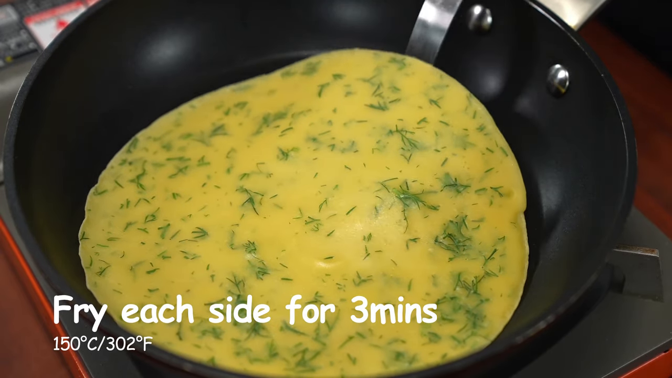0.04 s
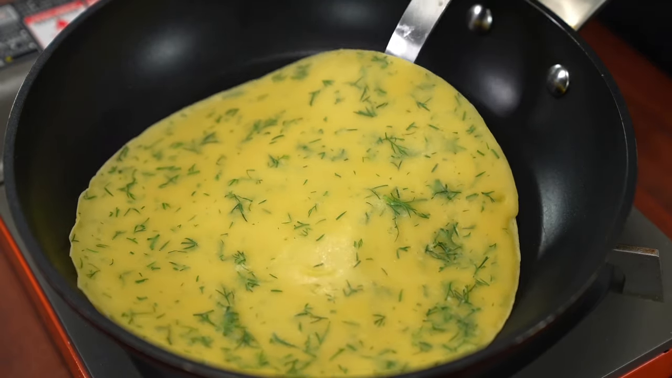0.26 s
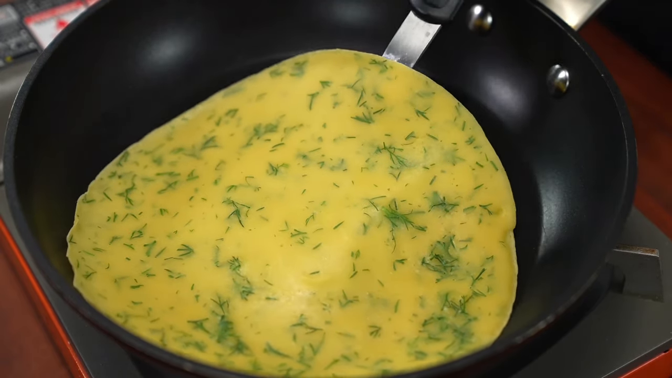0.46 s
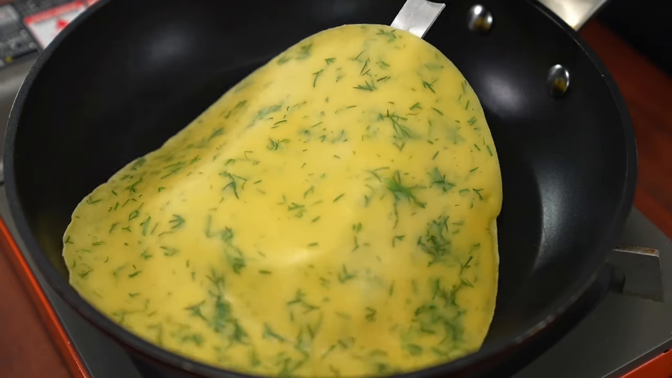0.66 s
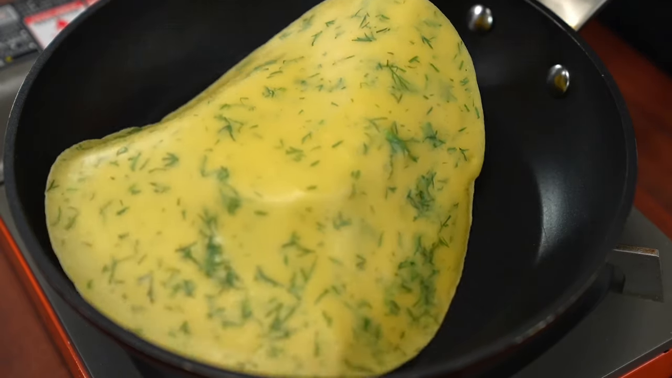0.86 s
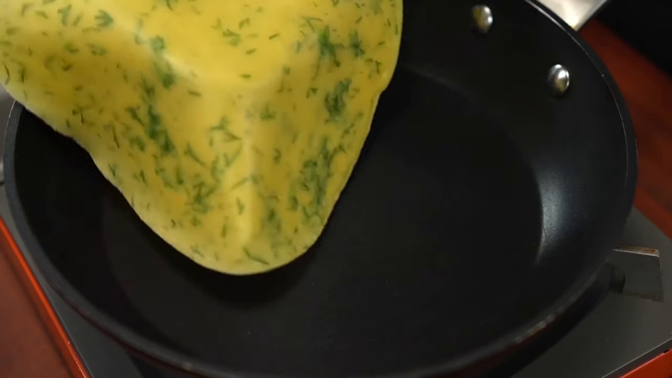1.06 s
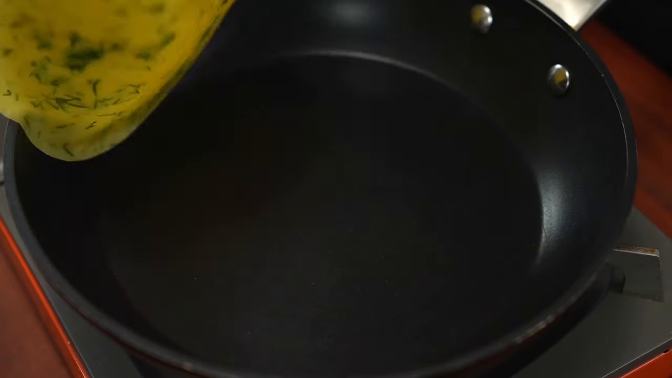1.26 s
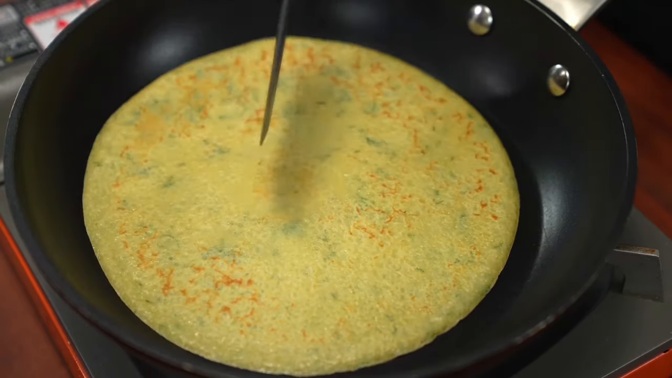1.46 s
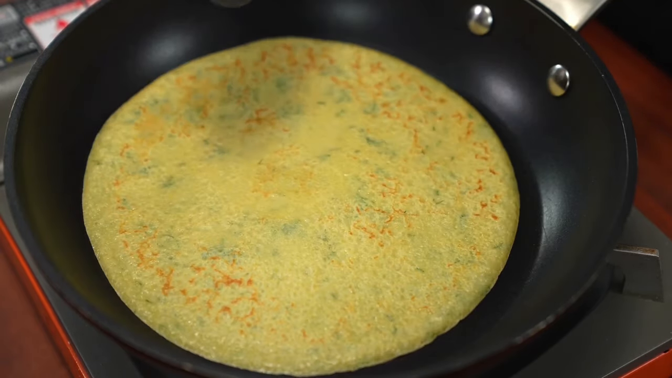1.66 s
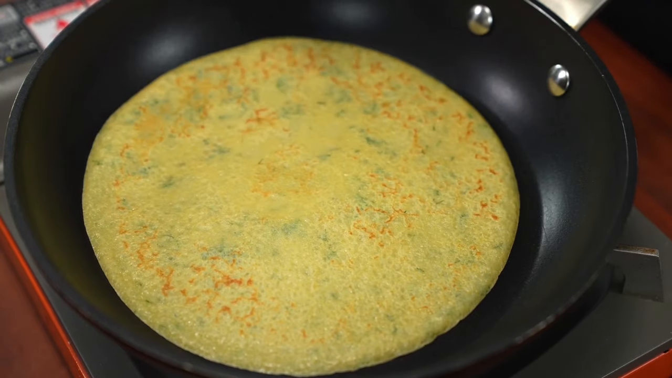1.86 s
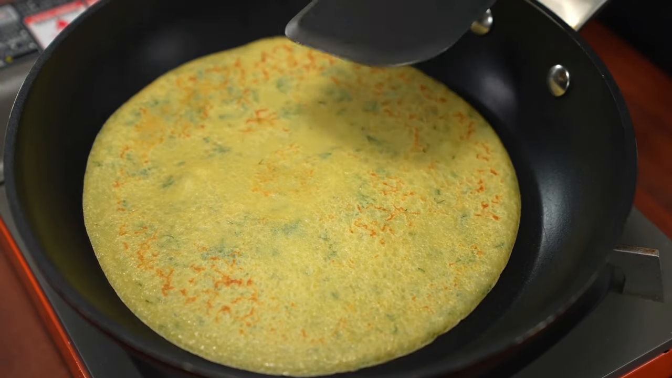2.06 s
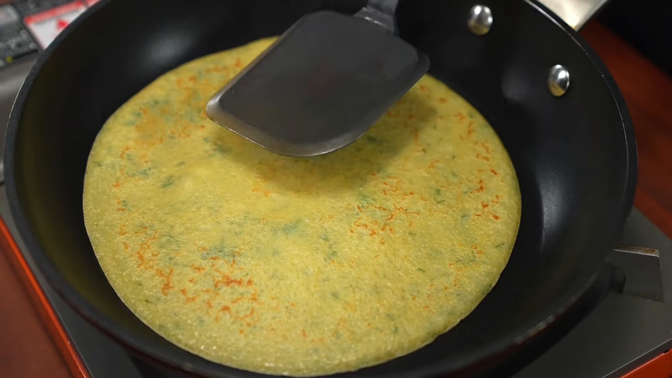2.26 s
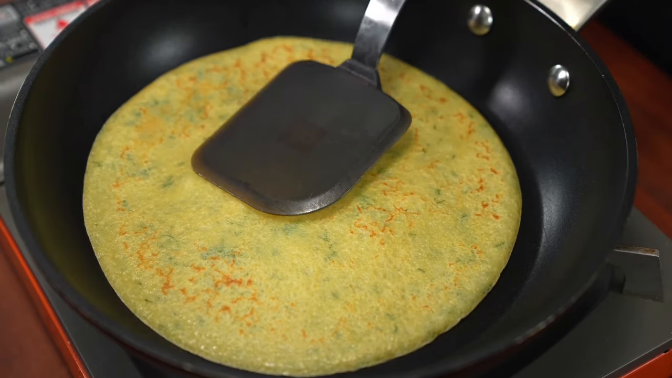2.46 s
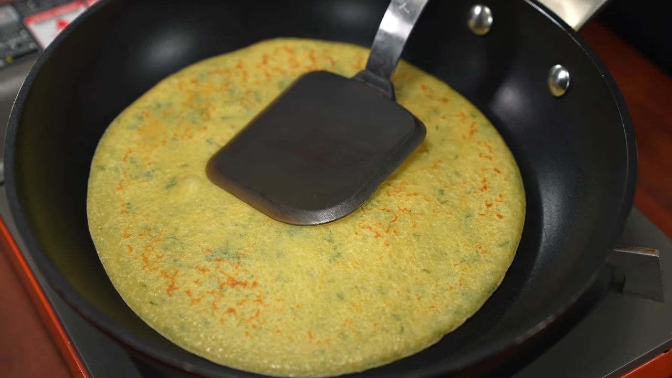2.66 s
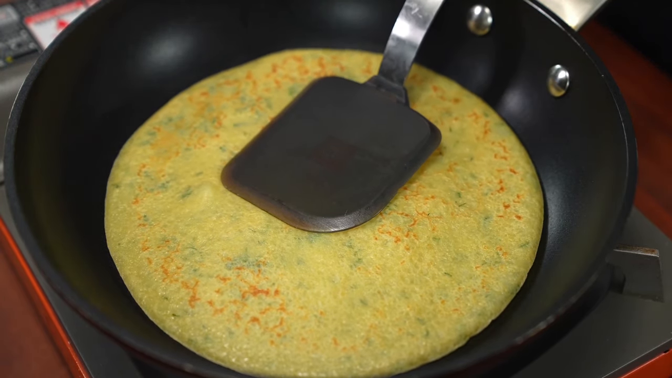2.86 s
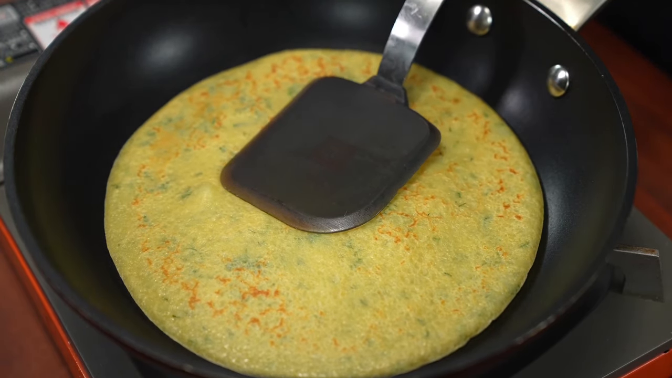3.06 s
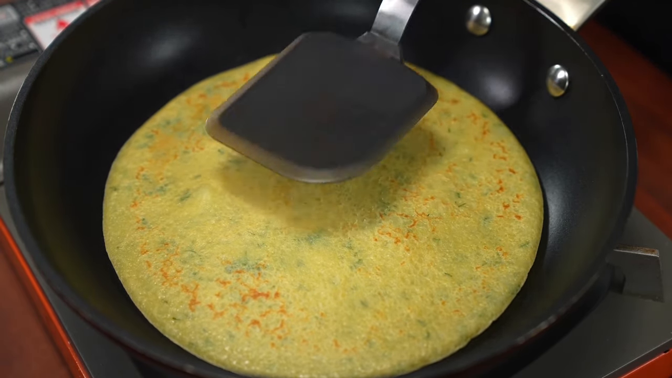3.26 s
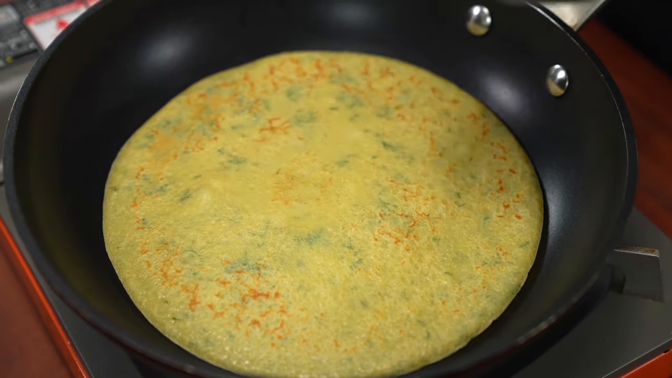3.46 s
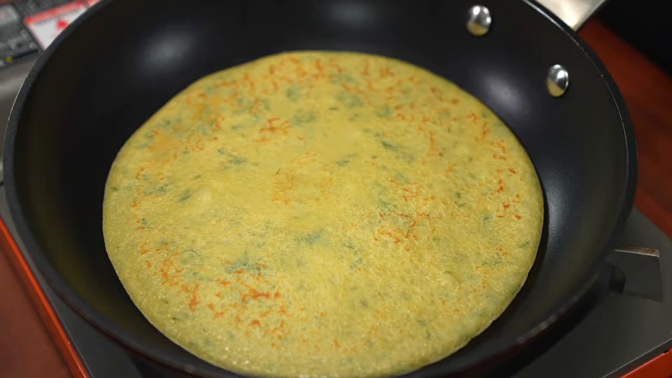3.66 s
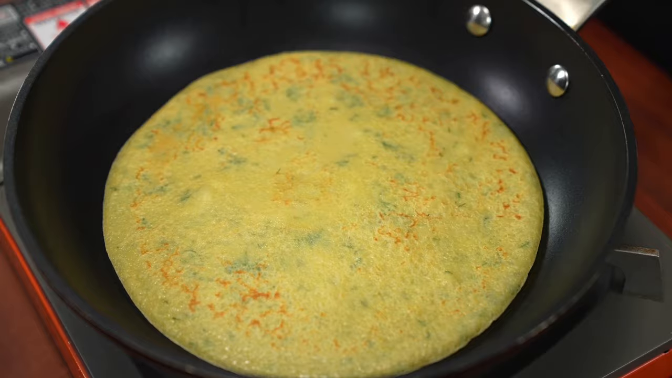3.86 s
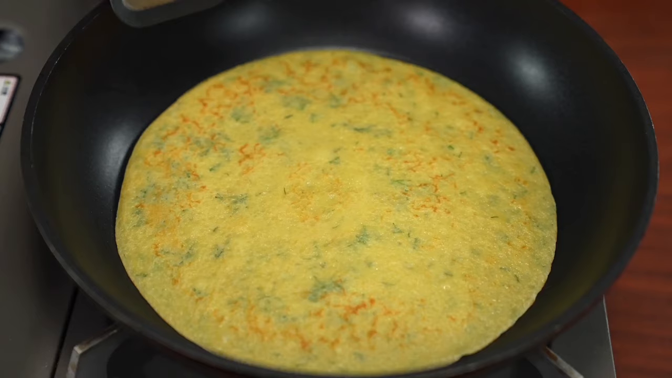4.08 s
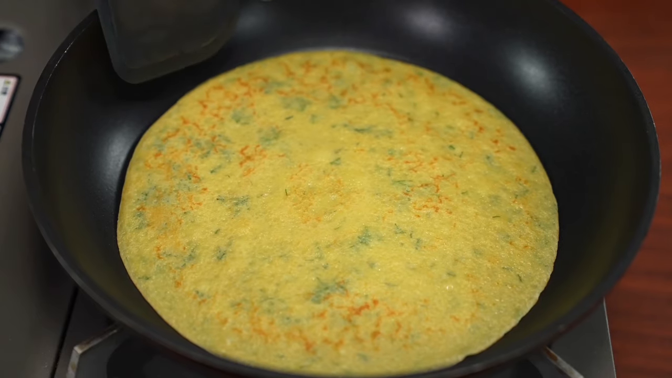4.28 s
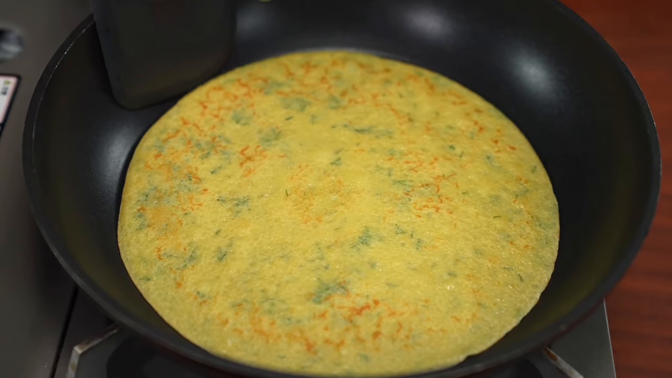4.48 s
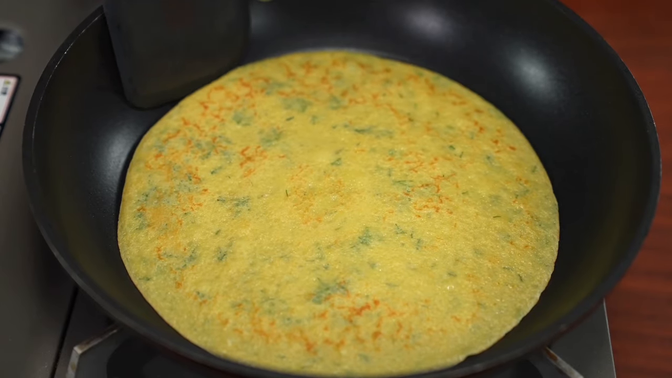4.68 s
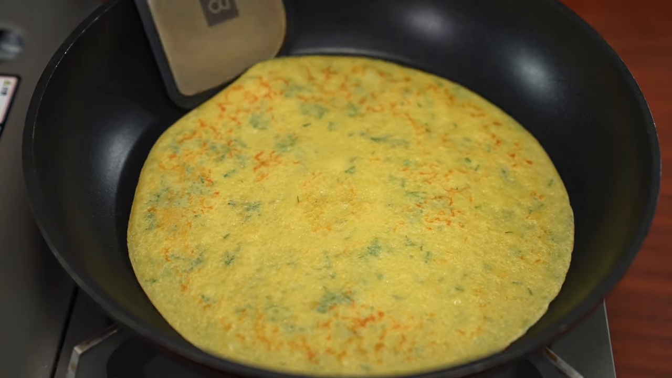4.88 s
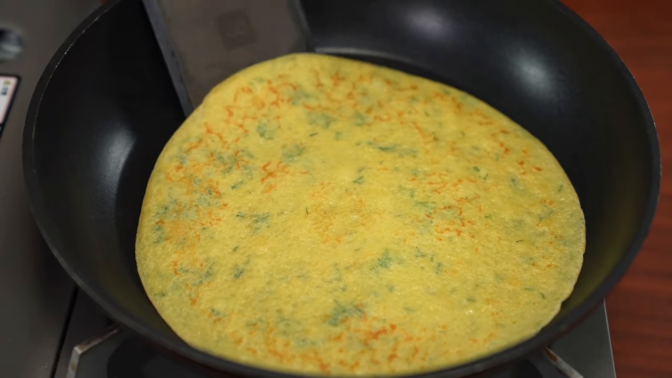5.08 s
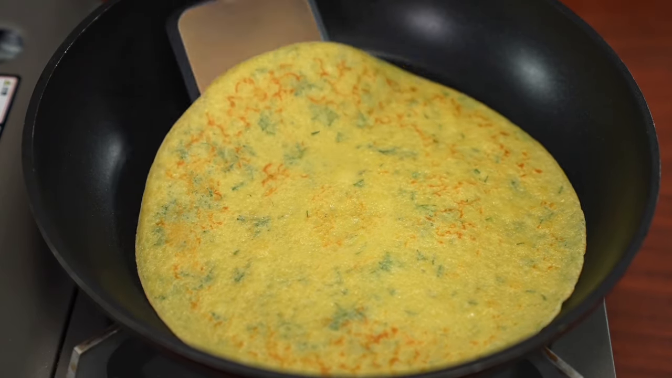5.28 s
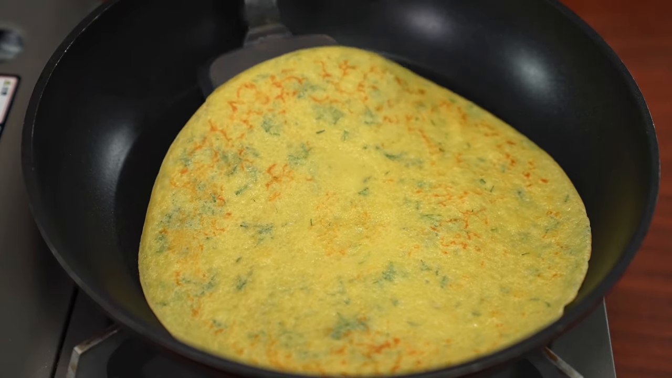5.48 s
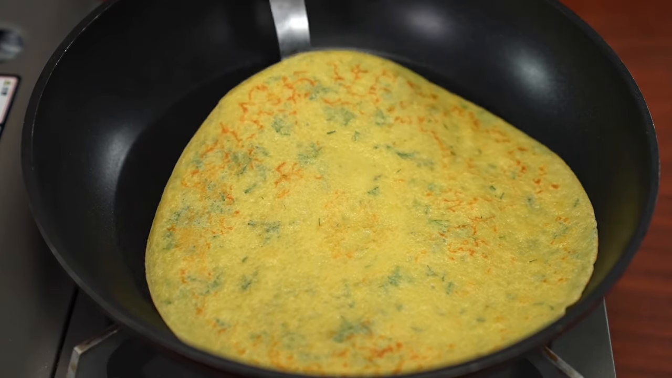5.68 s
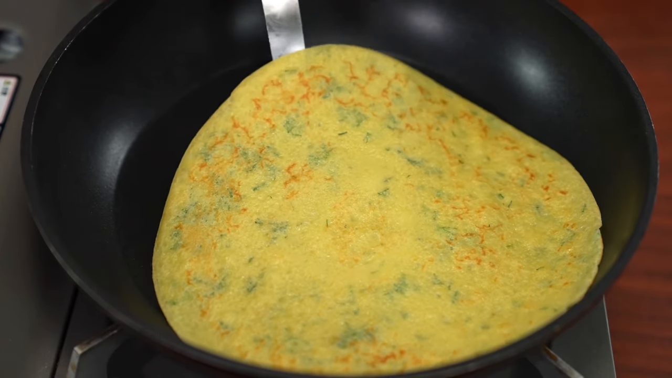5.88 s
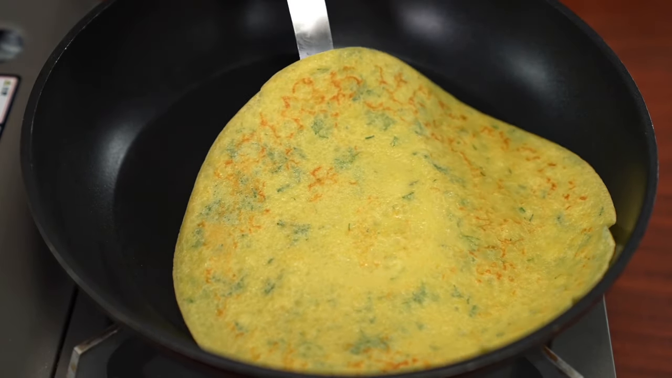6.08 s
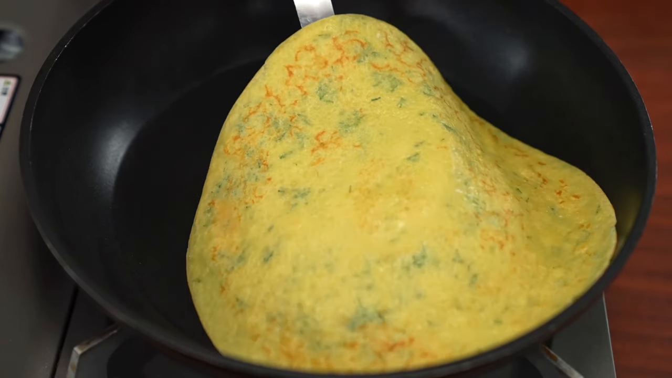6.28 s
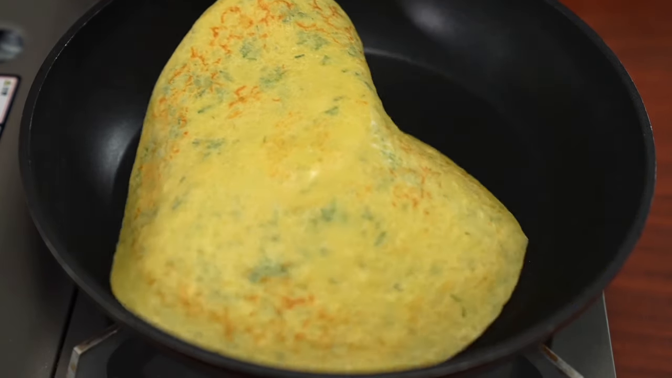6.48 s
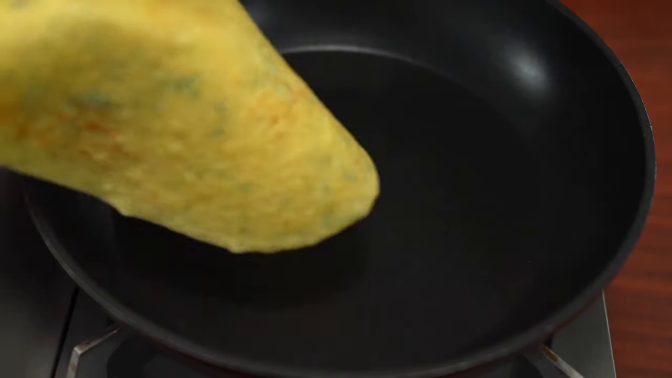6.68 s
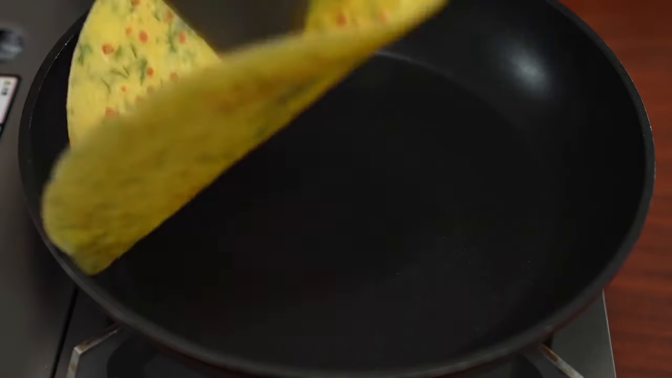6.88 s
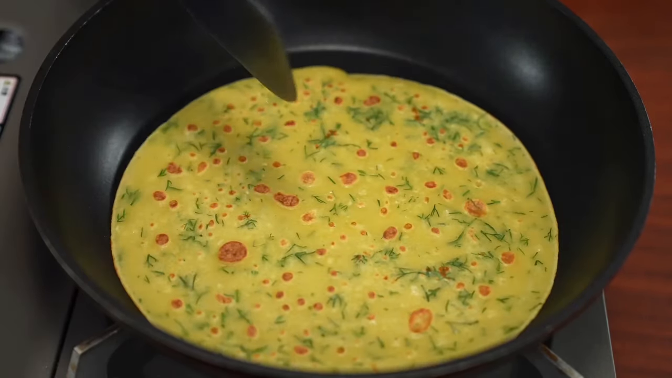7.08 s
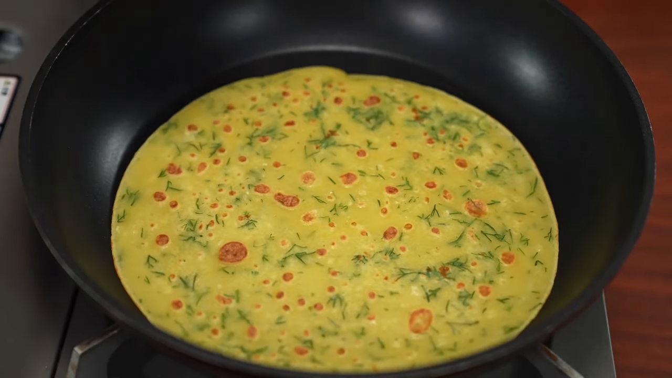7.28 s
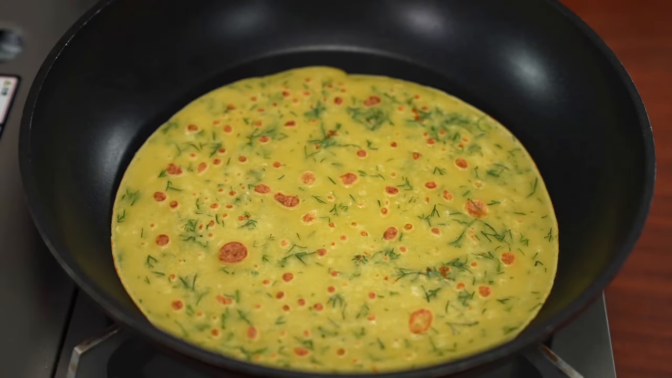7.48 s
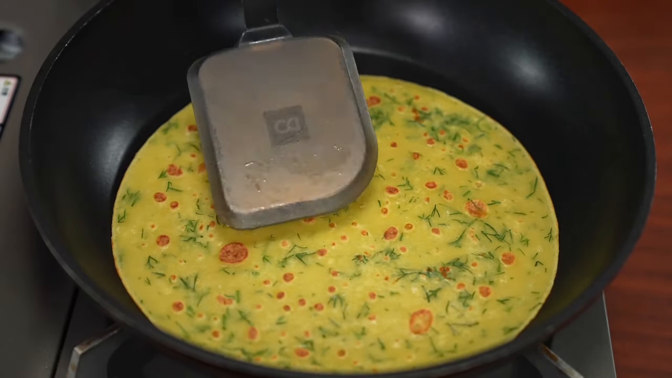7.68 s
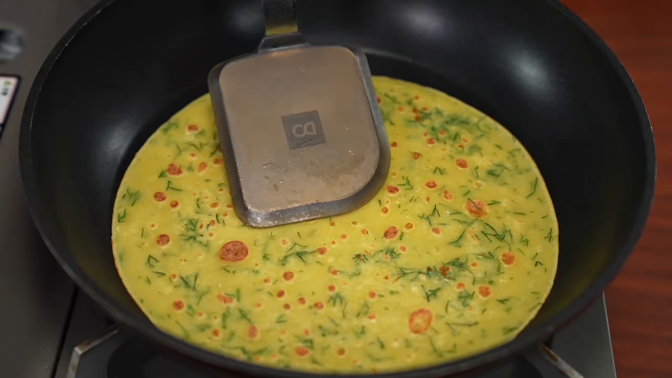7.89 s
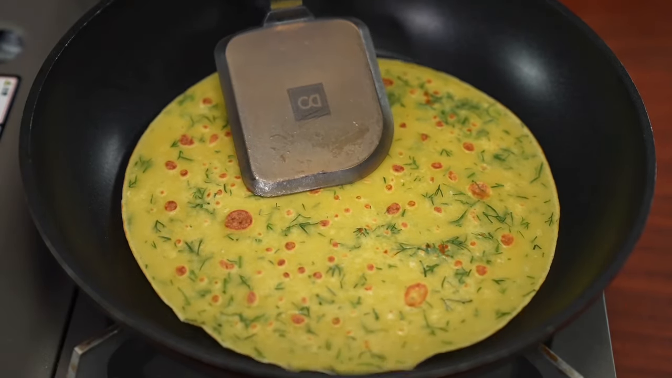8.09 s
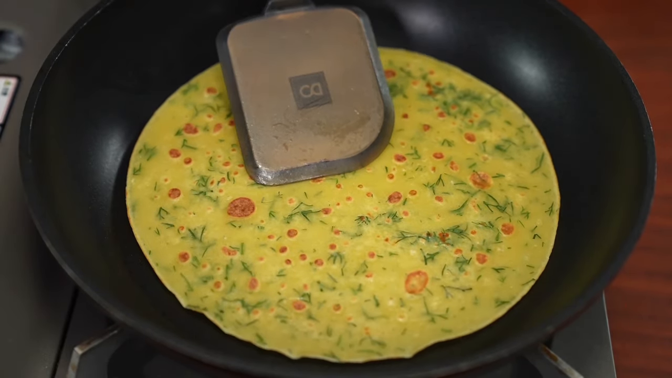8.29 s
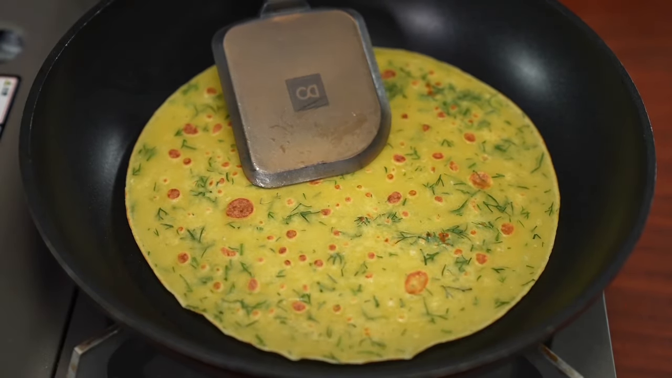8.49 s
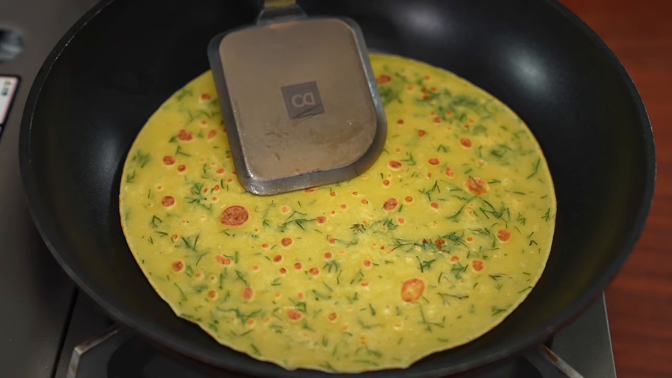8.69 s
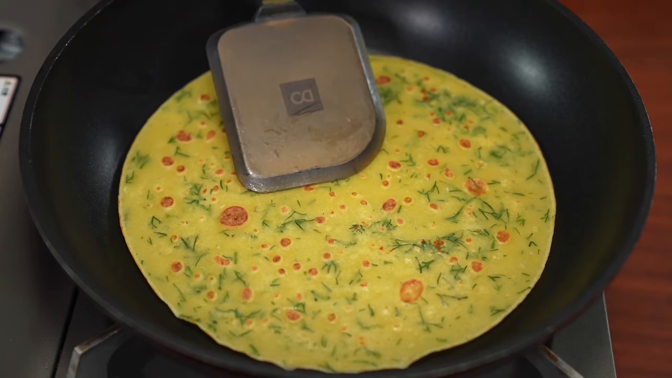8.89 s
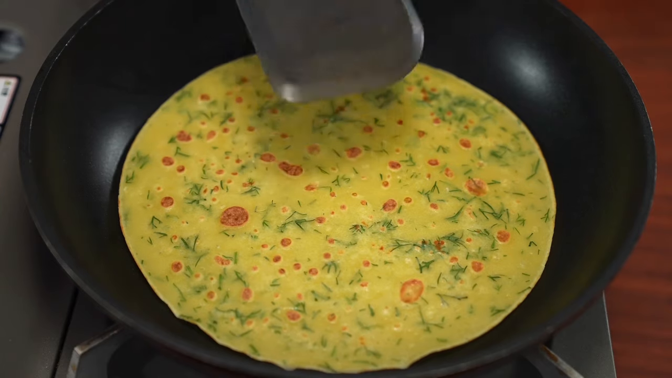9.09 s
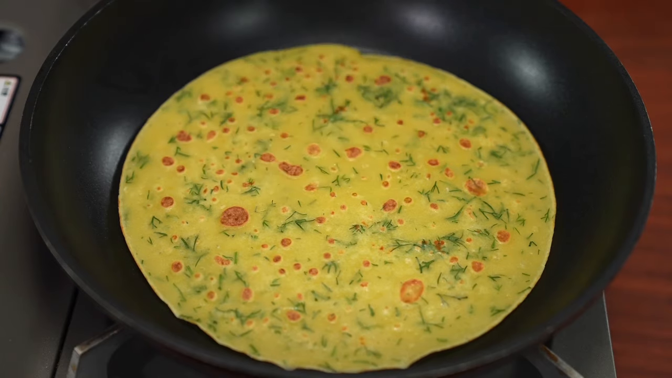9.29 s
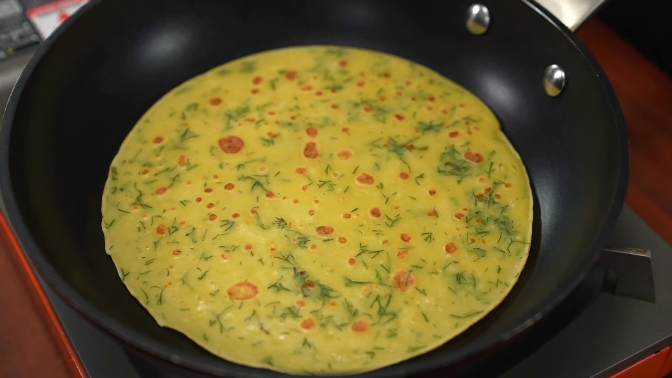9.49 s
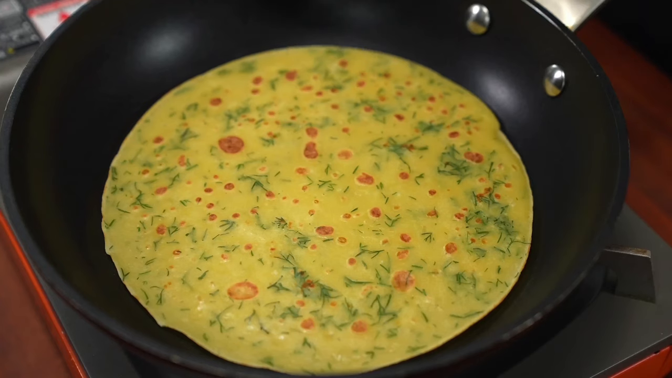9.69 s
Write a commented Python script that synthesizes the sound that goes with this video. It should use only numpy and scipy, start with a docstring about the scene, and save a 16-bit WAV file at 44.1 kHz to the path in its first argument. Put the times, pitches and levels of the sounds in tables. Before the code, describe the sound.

A thin pancake sizzles softly in a frying pan, and a spatula twice flips it with a slap and brief pan ring.

```python
"""A small kitchen, where a thin pancake fries in a deep pan. Tiny bubbles burst in the fat and make it
sizzle, and droplets spit. A spatula rubs over the metal and sets it humming. Twice the pancake is flipped:
it slaps down, squeezes out the air and makes the pan ring. After the first flip, pockets of steam pop
under the batter. The walls echo briefly, the pan jolts on its grate and the stove rumbles faintly."""
import sys
import numpy as np
from scipy import signal
from scipy.fft import rfft, irfft, next_fast_len
from scipy.io import wavfile

SR = 44100
rng = np.random.default_rng(int(sys.argv[2]) if len(sys.argv) > 2 else 0)


def inscribe(sig):
    """Save sig as 16-bit PCM at rate SR to the path in sys.argv[1].

    A 1-D sig is mono; a 2-D sig holds one channel per row.
    Samples are clipped to [-1, 1] before scaling.
    """
    pcm = np.round(np.clip(np.atleast_2d(sig).T, -1, 1) * 32767)
    wavfile.write(sys.argv[1], SR, pcm.astype(np.int16))


N = 429666

# steady frying: (time [s], sizzle level [dB], extra treble [dB], rustle level [dB])
FRYING = [(0.0, -66, 0.5, -66.5), (0.82, -67.5, 0.5, -70), (1.26, -81.5, -2, -82), (1.75, -72.5, -8, -78.5),
          (1.99, -65, -16.5, -67.5), (2.2, -69, -9.5, -69), (2.85, -67.5, -14.5, -63.5),
          (4.2, -67.5, -9, -70), (4.3, -65.5, 3, -66), (4.91, -65.5, -4, -67), (5.66, -59, -5, -65),
          (5.76, -68.5, 0.5, -64), (6.36, -65.5, 1, -64), (6.42, -76.5, -3.5, -69.5), (6.9, -83, -7, -86),
          (7.36, -70.5, -7.5, -75.5), (7.68, -70, -1, -75.5), (8.17, -58, -7, -69),
          (8.7, -64.5, 0.5, -69.5), (9.63, -63.5, 0.5, -70.5), (9.68, -69.5, -0.5, -80),
          (9.74, -62.5, 1, -75.5)]
# the spatula or batter sliding: (time of peak [s], rise [s], rubbing [dB], pan hum [dB], sizzle [dB])
STROKES = [(0.29, 0.0434, -62, -78.5, -75.5), (0.43, 0.057, -68, -80, -59),
           (1.38, 0.046, -66, -78.5, -76.5), (4.998, 0.052, -62, -76.5, -68),
           (5.131, 0.0884, -59, -71, -62), (5.484, 0.202, -67.5, -69, -67.5),
           (5.816, 0.022, -58.5, -70.5, -69.5), (5.887, 0.051, -54.5, -71.5, -66),
           (6.018, 0.0788, -55.5, -70, -59.5), (6.217, 0.0597, -56.5, -71.5, -58),
           (6.272, 0.067, -71.5, -62.5, -76), (6.494, 0.0453, -55.5, -63, -78.5),
           (6.613, 0.1152, -44, -61, -61), (6.728, 0.0228, -51, -56.5, -66.5),
           (6.753, 0.0436, -77.5, -55.5, -83), (7.048, 0.042, -69, -60.5, -79)]
# a fold of batter or the blade hits the metal; a "fade" is always the time taken to drop by 60 dB:
# (time [s], crack peak [dB], crack pitch [Hz], blow to the pan [dB], swell [s], crack fade [s],
# final pan pitch [ratio])
SLAPS = [(1.439, -45.5, 3630, -50.5, 0.0004, 0.308, 1.2), (1.456, -39.5, 635, -41.5, 0.00546, 0.216, 0.881),
         (1.555, -13.5, 4590, -18, 0.000574, 0.0143, 0.999),
         (1.572, -25.5, 2500, -33.5, 0.00292, 0.064, 0.97),
         (1.5813, -16.5, 2230, -27.5, 0.000554, 0.0099, 0.848),
         (1.619, -27, 1200, -39, 0.000906, 0.0096, 0.95), (4.454, -50.5, 533, -62.5, 0.014, 0.34, 0.836),
         (7.058, -32, 3450, -46, 0.003, 0.215, 1.04), (7.114, -29, 1490, -44.5, 0.00155, 0.088, 1.05),
         (7.123, -18.5, 2700, -26, .003, 0.12, 1.2), (7.130, -15.5, 4670, -20, 0.003415, 0.0114, 0.808),
         (7.147, -10.5, 1520, -26.5, 0.000996, 0.0078, 0.88), (7.171, -24, 5500, -44, 0.000398, 0.032, 1.0),
         (7.174, -13.5, 1926, -40.5, 0.000623, 0.0087, 0.575)]
# steam under the freshly turned side: (time [s], level [dB], extra treble [dB])
STEAM = [(2.16, -75.5, -11), (2.23, -57, -14), (2.78, -58, -5.5), (2.87, -54, 2), (2.96, -49, 1),
         (3.01, -53.5, -1.5), (3.14, -55.5, -3.5), (3.27, -54, -2.5), (3.42, -64, -9.5), (3.55, -58, -5.5),
         (3.83, -60, -3), (4.19, -58, -2.5), (4.245, -81.5, -3.5)]
HUM_HZ, HUM_FADE_S = 669.16, 0.12   # the pan's main note


def from_db(db):
    """Turn decibels into a factor to multiply by."""
    return 10 ** (np.asarray(db) / 20)


def rms_one(x):
    """Scale a sound to an average power of 1."""
    return x / np.sqrt(np.mean(x ** 2) + 1e-20)


def in_time(rows):
    """Join a table's rows with straight lines: one curve for each column after the time."""
    s, *columns = np.transpose(rows)
    return [np.interp(np.arange(N) / SR, s, c) for c in columns]


def at_hz(points, hz):
    """Read a table between its frequencies, with octaves evenly spaced."""
    known_hz, values = np.transpose(points)
    return np.interp(np.log(hz), np.log(known_hz), values)


def coloured(x, spectrum):
    """Shape the lows and highs of white noise; the result has power 1."""
    size = next_fast_len(N)
    hz = np.arange(size // 2 + 1) * SR / size + 1
    return rms_one(irfft(rfft(x, size) * from_db(at_hz(spectrum, hz)), size)[:N])


def band(x, low_hz, high_hz):
    """Keep what lies between two frequencies."""
    return signal.sosfilt(signal.butter(2, [low_hz, min(high_hz, 20000)], "band", fs=SR, output="sos"), x)


def drift(rate_hz):
    """A slow random wobble, about 1 in size."""
    r = np.exp(-80 * np.pi * rate_hz / SR)
    slow = signal.lfilter([1], [1, -2 * r, r * r], rng.standard_normal(N // 40 + 2002))[2000:]
    return np.interp(np.arange(N) / 40, np.arange(len(slow)), rms_one(slow))


def ring(clicks, hz, fade_s):
    """Each click starts a pure tone that dies away."""
    r, w = from_db(-60 / (fade_s * SR)), 2 * np.pi * hz / SR
    return signal.lfilter([0, np.sin(w)], [1, -2 * r * np.cos(w), r * r], clicks + 1e-18)


def grains(per_s, spread_db):
    """Random clicks, most small and a few large."""
    sizes = from_db(spread_db * np.minimum(rng.exponential(1, N), 5)) * rng.choice([-1, 1], N)
    return sizes * (rng.random(N) < per_s / SR)


def add(out, s, sound):
    """Mix a short sound in at s seconds."""
    at = round(s * SR)
    out[at:at + len(sound)] += sound[:N - at]


def burst(swell_s, fade_s):
    """Noise that grows for six swell times and then dies away."""
    t = np.arange(int(.2 * SR)) / SR - 6 * swell_s
    return rng.standard_normal(len(t)) * np.where(t < 0, np.exp(t / swell_s), from_db(-60 * t / fade_s))


def swells(steady_db, tops, rises, falls, peaks_db, order):
    """A level in dB with swells, each 10 dB down one rise before and one fall after its top."""
    power = from_db(2 * steady_db) + np.zeros(N)
    for s, rise, fall, db in zip(tops, rises, falls, peaks_db):
        t = np.arange(N) / SR - s
        distance = np.where(t < 0, -t / rise, t / fall)
        power = power + from_db(2 * db - 20 * distance ** order)   # order 1 is pointed, 2 is rounded
    return 10 * np.log10(power)


def sizzle(level_db, treble_db):
    """Tiny bubbles burst in the fat in clumps, over a smooth, bright hiss."""
    # tone of hot fat: (frequency [Hz], relative level [dB])
    spectrum = [(2500, -6.5), (4000, -8), (5200, 3), (8000, 2.5), (10000, 2), (16000, -3.5)]
    bubbles = rms_one(grains(2500 * from_db(3.3 * drift(15)), spread_db=5.0))
    fizz = coloured(0.87 * bubbles + rng.standard_normal(N), spectrum)
    low, high = band(fizz, 1502, 9030), band(fizz, 6300, 15400)
    return from_db(level_db + 1.2 * drift(25.2)) * (rms_one(low) + from_db(treble_db) * rms_one(high))


def rubbing(level_db, hum_db):
    """Blade and batter drag over the metal in many tiny slips and set the pan humming in fits."""
    # tone of the rubbing: (frequency [Hz], relative level [dB])
    spectrum = [(240, -66.5), (400, -33), (663, -12), (1130, -6), (1880, -7.5), (2750, -12), (3900, -11),
                (7060, -14.5), (14000, -34.5)]
    slips = rms_one(grains(4000, spread_db=3.0)) + 0.59 * rng.standard_normal(N)
    hum = rms_one(ring(rng.standard_normal(N), HUM_HZ, HUM_FADE_S))
    rub = from_db(level_db + drift(30)) * coloured(slips, spectrum)
    return rub + from_db(hum_db + 1.5 * drift(7)) * hum


def frying_and_strokes():
    """The pancake sizzles and rustles; each stroke stirs up the fat, rubs and makes the pan hum more."""
    sizzle_db, treble_db, rustle_db = in_time(FRYING)
    s, rise, rub_db, hum_db, stirred_db = np.transpose(STROKES)
    timing = s, rise, 0.886 * rise   # a stroke falls a little faster than it rises
    fat = sizzle(swells(sizzle_db, *timing, stirred_db, order=2), treble_db)
    rub_curve = swells(rustle_db, *timing, rub_db, order=2)
    hum_curve = swells(rustle_db - 11, *timing, hum_db, order=2)
    return fat + rubbing(rub_curve, hum_curve)


def slaps():
    """Each fold lands with a crack of escaping air; trapped air rings and the batter patters as it settles."""
    out = np.zeros(N)
    for s, crack_db, hz, _, swell_s, fade_s, _ in SLAPS:
        puff = burst(swell_s, fade_s)
        trapped = from_db(-0.5) * band(puff, hz / 1.31, hz * 1.371)
        crack = band(puff, hz / 2.9, hz * 3.08) + trapped
        patter = band(burst(swell_s=0.0034, fade_s=0.2417), 250, 1960)
        add(out, s - 6 * swell_s, from_db(crack_db) * crack / np.abs(crack).max())
        add(out, s - .012, from_db(crack_db - 16.5) * patter)
    return out


def pan_ring():
    """Each slap rings the pan; slow ones favour its low notes, and the batter's weight bends the pitch."""
    # the pan's notes, muffled by batter: (pitch [Hz], level [dB], fade [s])
    notes = [(372.2, -18.5, 0.06), (649.1, -1, 0.058), (1147, -2, 0.028), (1826, -11, 0.02)]
    start_ratio, hardest_swell_s = 1.08, 0.00038
    out, t = np.zeros(N), np.arange(SR // 4) / SR
    chances_db = rng.normal(0, 1.5, (len(SLAPS), len(notes)))
    for (s, _, _, blow_db, swell_s, _, end_ratio), row in zip(SLAPS, chances_db):
        landing_s = 2.5 * swell_s
        bend = end_ratio + (start_ratio - end_ratio) * np.exp(-t / landing_s)
        bent_time = np.cumsum(bend) / SR
        build_up = np.sin(np.pi / 2 * np.minimum(t / landing_s, 1)) ** 2
        since_landing = np.maximum(t - landing_s, 0)
        db_per_octave = -3.5 * np.log2(swell_s / hardest_swell_s)
        for (hz, note_db, fade_s), chance_db in zip(notes, row):
            level_db = blow_db + note_db + chance_db + db_per_octave * np.log2(hz / HUM_HZ)
            loudness = build_up * from_db(level_db - 60 * since_landing / fade_s)
            add(out, s - swell_s, loudness * np.sin(2 * np.pi * hz * bent_time))
    return out


def pocket(clicks, hz, cycles):
    """A steam pocket opens and rings for a few cycles."""
    return band(ring(clicks, hz, cycles / hz), 760, 2600)


def steam_pops():
    """Each loud pocket tears open with one sharp tick and a run of smaller ones, and snaps in the treble."""
    # loud steam pockets: (time [s], peak of the ringing [dB])
    pops = [(2.25, -42), (2.42, -39.5), (2.497, -42), (2.338, -37.5), (2.443, -42), (2.462, -38),
            (2.516, -40), (2.6, -42), (2.666, -40.5), (2.864, -36), (2.894, -35), (2.904, -36.5),
            (2.918, -33), (2.951, -35), (2.964, -34), (2.983, -36.5), (3.052, -36.5), (3.089, -36.5),
            (3.108, -39), (3.198, -37.5), (3.333, -35.5), (3.357, -40), (3.425, -44), (3.501, -37.5),
            (3.551, -38), (3.567, -34.5), (3.633, -37.5), (3.805, -41.5), (3.826, -36), (3.924, -38.5),
            (3.961, -40), (3.972, -36), (4.041, -39.5), (4.073, -40), (4.122, -38), (4.165, -35),
            (4.213, -36.5)]
    out, length = np.zeros(N), 1200
    fading = from_db(-3.5 - 900 * np.arange(length) / SR)
    steam_s, _, steam_treble_db = np.transpose(STEAM)
    pitches = rng.uniform([1200, 4200], [1800, 7500], (len(pops), 2))
    for (s, peak_db), (body_hz, snap_hz) in zip(pops, pitches):
        ticks = fading * rng.standard_normal(length) * (rng.random(length) < .012)
        tear = signal.unit_impulse(length) + ticks
        body = pocket(tear, body_hz, cycles=2.5)
        snap_db = np.interp(s, steam_s, steam_treble_db) + 10.5
        snap = from_db(snap_db) * band(tear, snap_hz / 1.4, snap_hz * 1.4)
        add(out, s, from_db(peak_db) * (body / np.abs(body).max() + snap))
    return out


def steam_crackle():
    """Small steam pockets of eight sizes open in clumps after the first flip."""
    silent_before, silent_after = (STEAM[0][0] - .02, -120, 0), (STEAM[-1][0] + .02, -120, 0)
    level_db, treble_db = in_time([silent_before, *STEAM, silent_after])
    clicks = grains(480 * from_db(4.0 * drift(25)), spread_db=3.5)
    size, pitches = rng.integers(0, 8, N), np.geomspace(950, 2200, 8)
    pockets = sum(pocket(clicks * (size == k), hz, cycles=1.9) for k, hz in enumerate(pitches))
    snap = band(rms_one(clicks) + 0.28 * rng.standard_normal(N), 2900, 7500)
    return from_db(level_db - 3.5) * (rms_one(pockets) + from_db(treble_db) * rms_one(snap))


def fat_spits():
    """Droplets of fat burst with a click and a wisp of steam: big ones mostly click, small ones squeak."""
    # bursting droplets: (time [s], click level [dB], pitch [Hz])
    droplets = [(0.1865, -37.5, 2300), (0.6335, -27, 7150), (0.8969, -41, 9340), (1.991, -41.5, 5250),
                (2.078, -44.5, 5700), (2.15, -36, 6450), (5.159, -30, 7400), (5.935, -28, 12140),
                (5.9733, -36.5, 3600), (6.0432, -23.5, 11000), (6.0439, -33, 2790), (6.113, -36.5, 3490),
                (6.1863, -42.5, 7390), (7.931, -30, 8000), (8.0555, -42, 5350), (8.0925, -41.5, 5740),
                (8.1628, -36.5, 5280), (8.202, -46, 1500), (8.258, -40, 5170), (8.3848, -43, 5200),
                (8.786, -42, 1480), (9.0917, -37.5, 8410)]
    out = np.zeros(N)
    for s, click_db, hz in droplets:
        click = band(signal.unit_impulse(int(.2 * SR)), hz / 1.5, hz * 2)
        wisp = band(burst(swell_s=0.00005, fade_s=0.0256), hz * 0.848, hz * 1.132)
        add(out, s, from_db(click_db - 1.5) * click / click.max() + from_db(-42.8) * wisp)
    return out


def steam_jets():
    """Steam escapes with a short, sputtering hiss as an edge lifts."""
    # jets of steam: (time [s], length [s], level [dB], pitch [Hz])
    jets = [(0.608, 0.0198, -51, 7850), (5.868, 0.0215, -51, 12000), (6.284, 0.0155, -45, 10400),
            (6.749, 0.0089, -50, 2200)]
    out = np.zeros(N)
    for s, length_s, level_db, hz in jets:
        sputter = rng.standard_normal(int(length_s * SR)) ** 3
        hiss = rms_one(band(sputter, hz / 1.59, hz * 2.0))
        add(out, s, from_db(level_db) * hiss * np.hanning(len(hiss)) ** 0.18)
    return out


def kitchen_echo(x):
    """The walls return a blur of echoes that lasts longest in the bass."""
    # how long the room rings: (frequency [Hz], fade [s])
    fades = [(250, 0.43), (700, 0.33), (2000, 0.23), (6000, 0.054), (12000, 0.21)]
    t, tail = np.arange(SR // 2) / SR, 0
    for hz in 125 * 2. ** np.arange(8):
        noise = band(rng.standard_normal(len(t)), hz / np.sqrt(2), hz * np.sqrt(2))
        tail = tail + noise * from_db(-60 * t / at_hz(fades, hz)) * (t > .004)
    return signal.fftconvolve(band(x, 60, 15000), tail / np.sqrt(np.sum(tail ** 2)))[:N]


def room_air():
    """Steady noise of the room and stove; left and right differ only in the low range."""
    # tone of the air and stove: (frequency [Hz], relative level [dB])
    spectrum = [(15, -33), (25, -2), (180, -11.5), (427, -18.5), (516, -14), (754, -25), (818, -20),
                (1070, -26.5), (16000, -43)]
    middle, side = coloured(rng.standard_normal(N), spectrum), coloured(rng.standard_normal(N), spectrum)
    side = from_db(-4.0) * band(band(side, 15, 1100), 15, 1600)
    return from_db(-68.5) * (middle + side * [[1], [-1]])


def grate():
    """The stove's grate rumbles faintly, and thuds and rumbles more when the pan is jolted."""
    # jolts of the pan: (time of peak [s], time to drop 10 dB [s], thud [dB], rumble [dB])
    jolts = [(1.46, 0.1054, -57.5, -59.5), (1.6, 0.1762, -45.5, -50), (2.1, 0.06, -78.5, -66.5),
             (4.5, 0.71, -64, -67.5), (4.97, 0.03, -70.5, -65.5), (7.18, 0.06, -44, -50),
             (7.4, 0.24, -55.5, -71.5), (7.62, 0.01, -60.5, -61.5)]
    s, fall, thud_db, rumble_db = np.transpose(jolts)
    timing = s, np.full(len(s), 0.06), fall
    thud_curve = swells(-73.5, *timing, thud_db, order=1)
    rumble_curve = swells(-75.5, *timing, rumble_db, order=1)
    thud = from_db(thud_curve) * rms_one(band(rng.standard_normal(N), 26, 48))
    rumble = from_db(rumble_curve + 2.0 * drift(3.1)) * rms_one(band(rng.standard_normal(N), 93, 227))
    return thud + rumble


def scene():
    """Everything in the pan lies straight ahead; the walls echo the slaps most clearly."""
    landings = pan_ring() + slaps()
    steam = steam_pops() + steam_crackle()
    pan_answer = from_db(-43.5) * ring(steam, HUM_HZ, HUM_FADE_S / 2)
    small_sounds = steam + pan_answer + fat_spits() + steam_jets()
    to_walls = landings + from_db(-5.5) * small_sounds
    middle = kitchen_echo(to_walls)
    side = from_db(-35) * kitchen_echo(to_walls) * [[1], [-1]]   # added on the left, taken off the right
    echoes = from_db(-17.5) * (middle + side)
    return landings + small_sounds + echoes + frying_and_strokes() + room_air() + grate()


def record(dry):
    """Cut away the very highest treble."""
    return signal.sosfilt(signal.cheby2(14, 60, 16400, fs=SR, output="sos"), dry)


dry = scene()
out = record(dry)
inscribe(out)
```